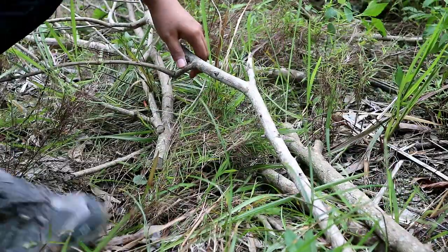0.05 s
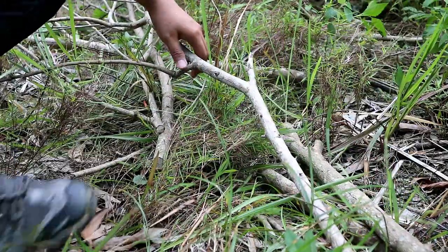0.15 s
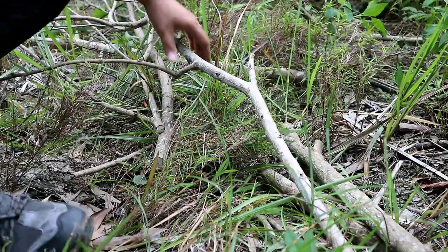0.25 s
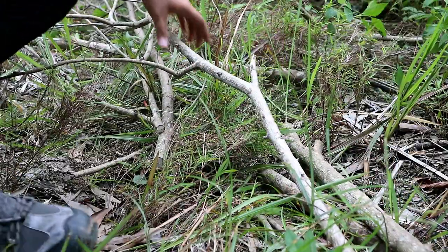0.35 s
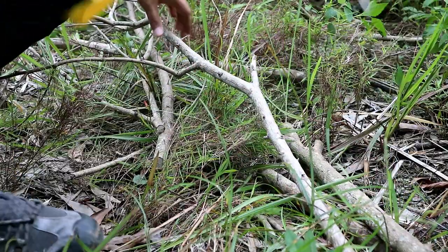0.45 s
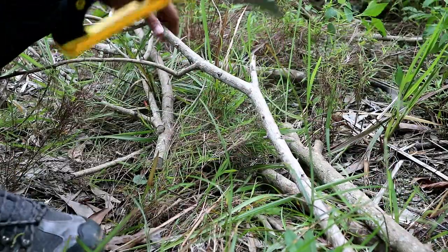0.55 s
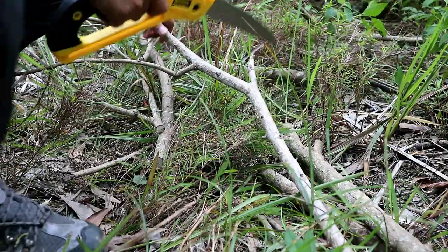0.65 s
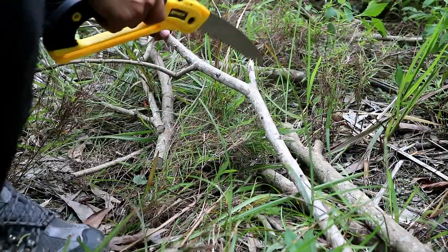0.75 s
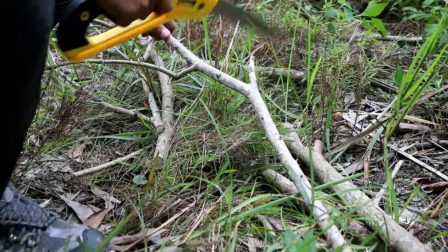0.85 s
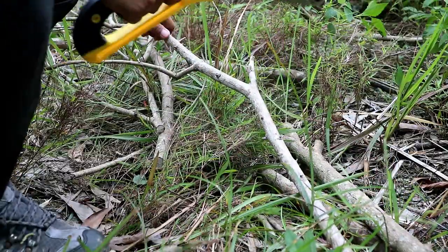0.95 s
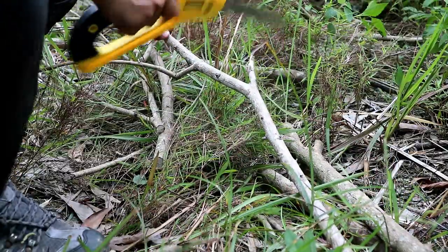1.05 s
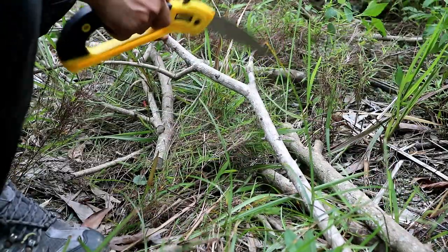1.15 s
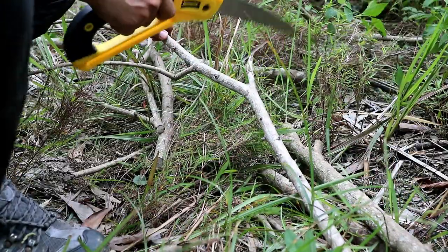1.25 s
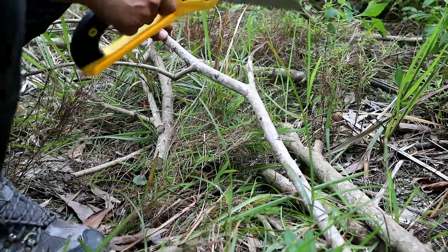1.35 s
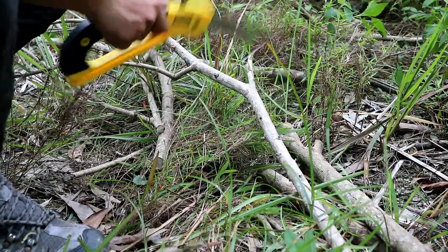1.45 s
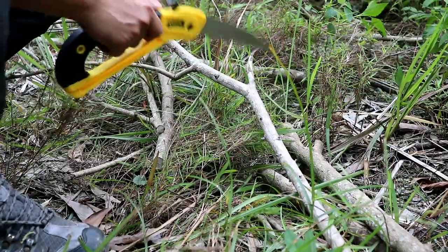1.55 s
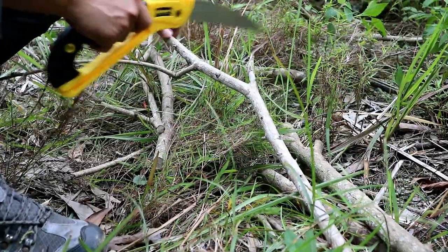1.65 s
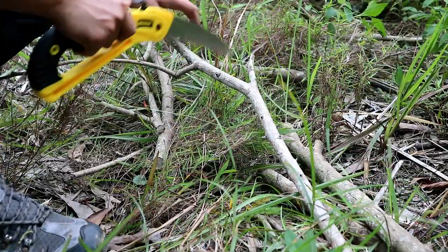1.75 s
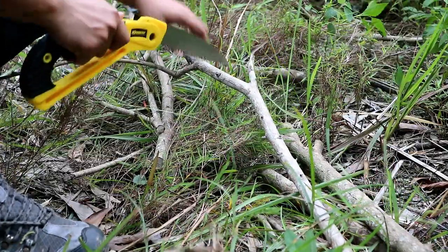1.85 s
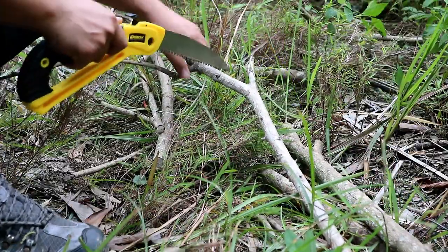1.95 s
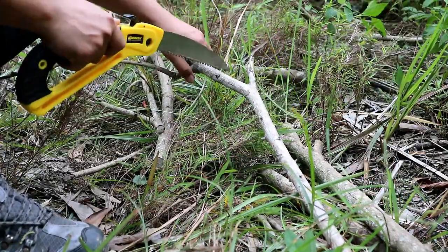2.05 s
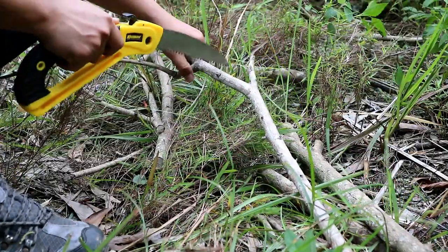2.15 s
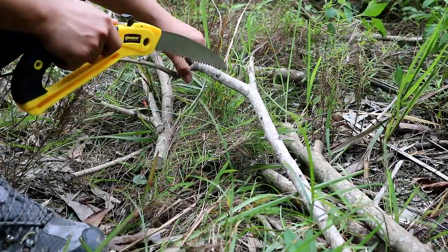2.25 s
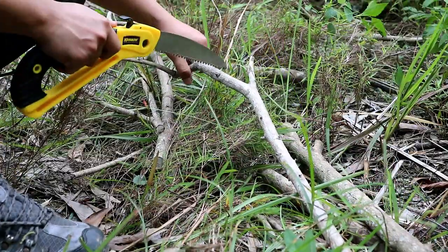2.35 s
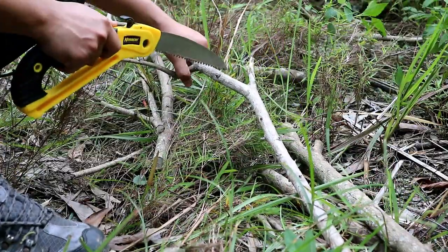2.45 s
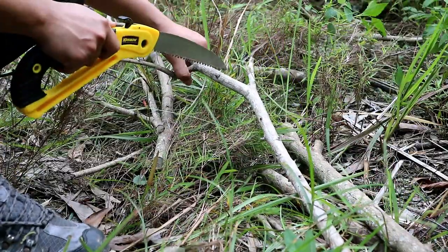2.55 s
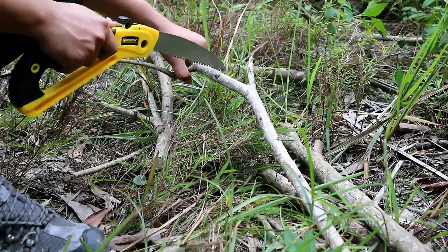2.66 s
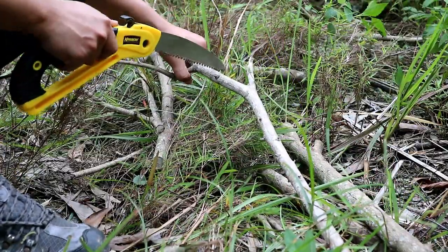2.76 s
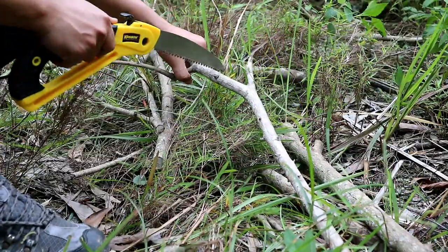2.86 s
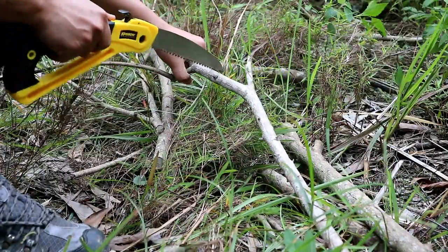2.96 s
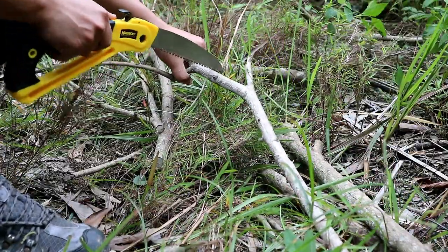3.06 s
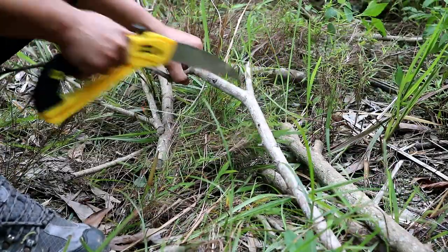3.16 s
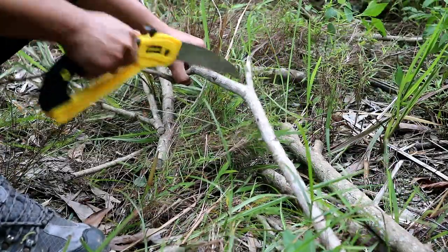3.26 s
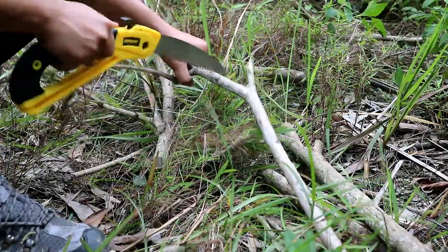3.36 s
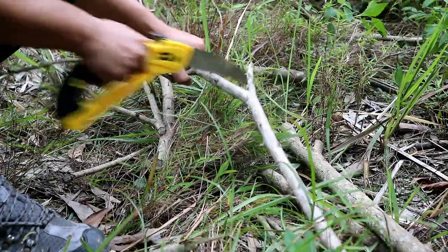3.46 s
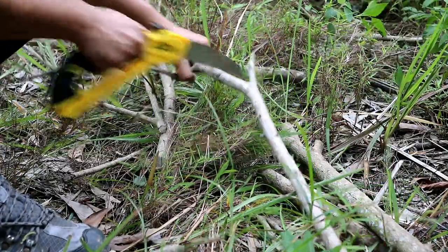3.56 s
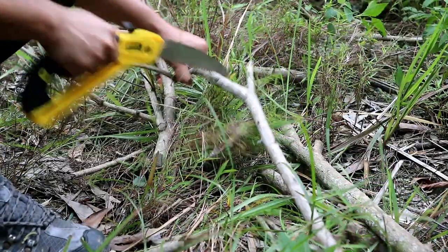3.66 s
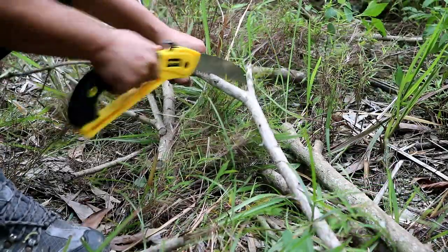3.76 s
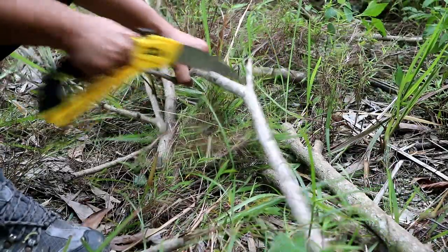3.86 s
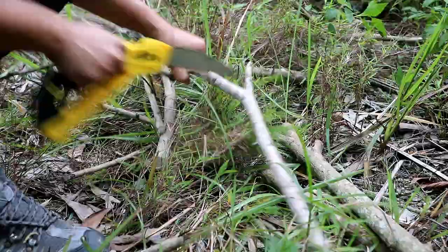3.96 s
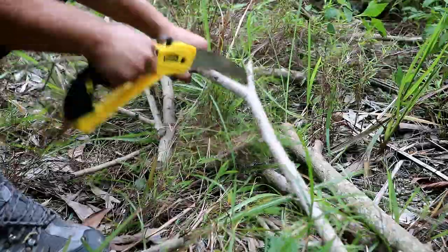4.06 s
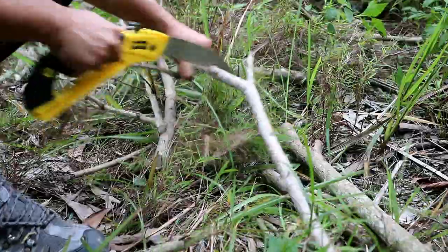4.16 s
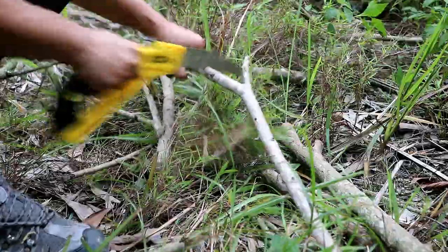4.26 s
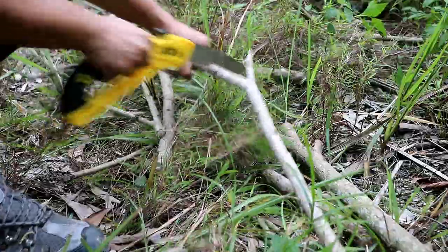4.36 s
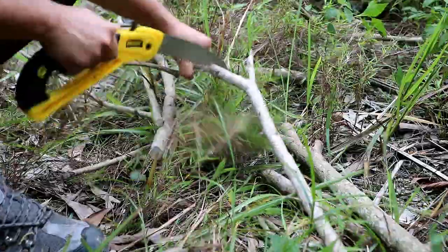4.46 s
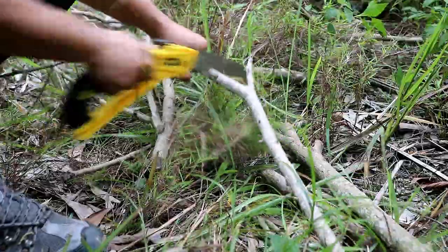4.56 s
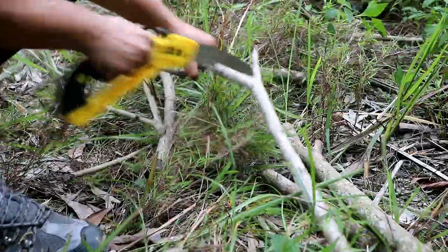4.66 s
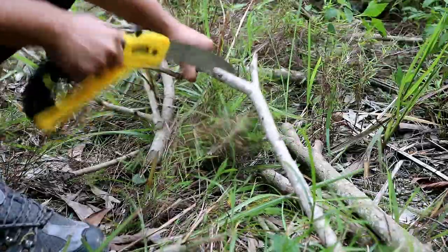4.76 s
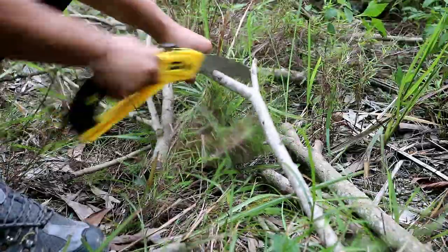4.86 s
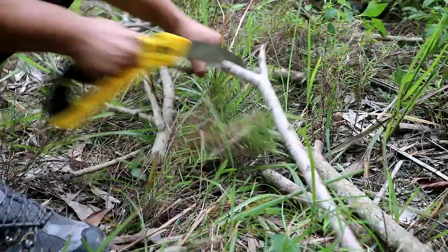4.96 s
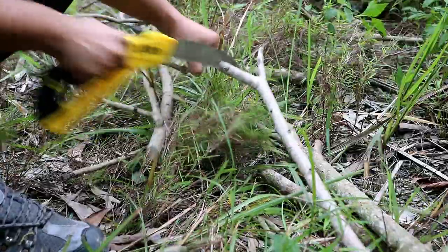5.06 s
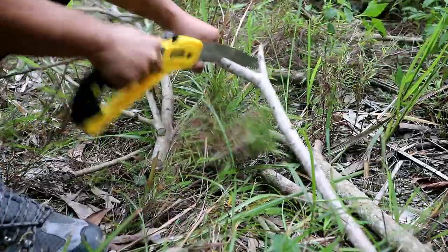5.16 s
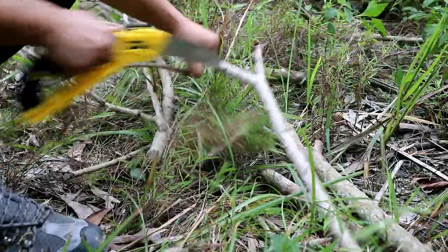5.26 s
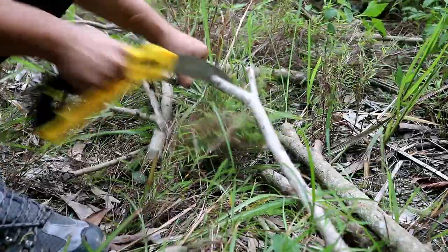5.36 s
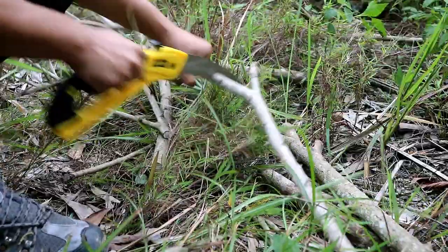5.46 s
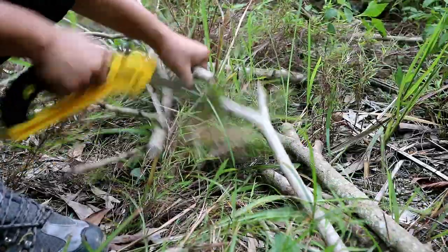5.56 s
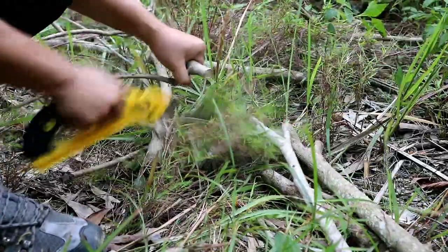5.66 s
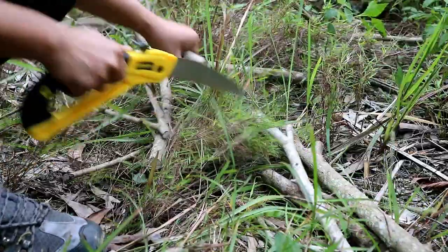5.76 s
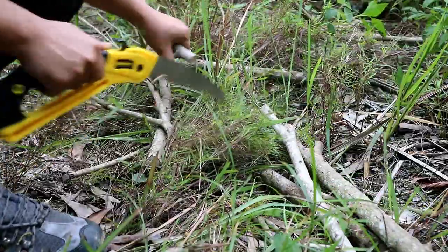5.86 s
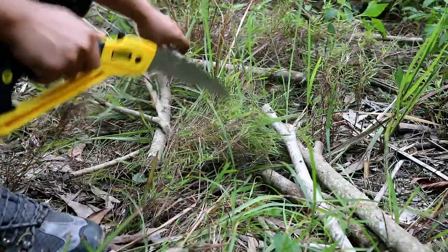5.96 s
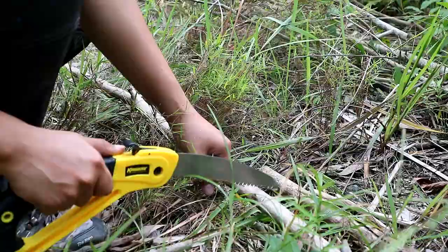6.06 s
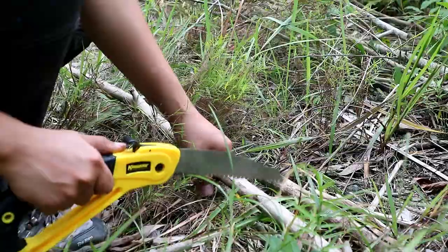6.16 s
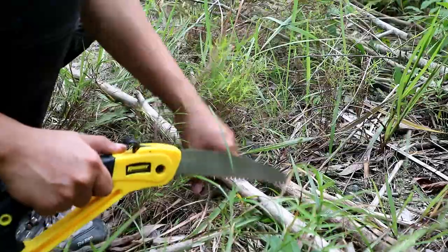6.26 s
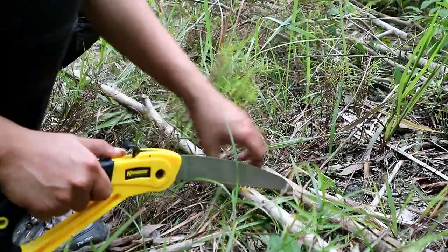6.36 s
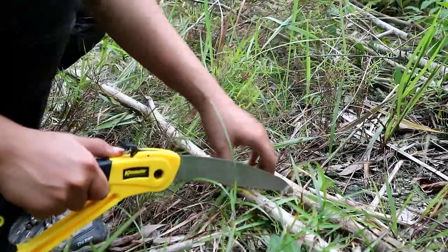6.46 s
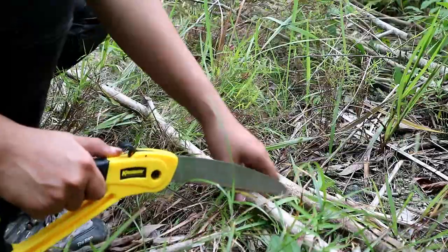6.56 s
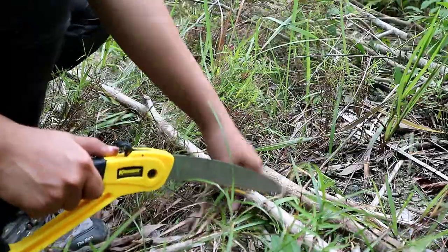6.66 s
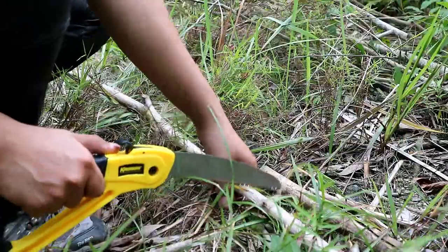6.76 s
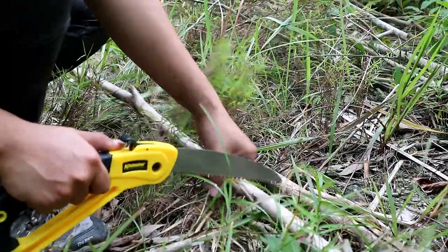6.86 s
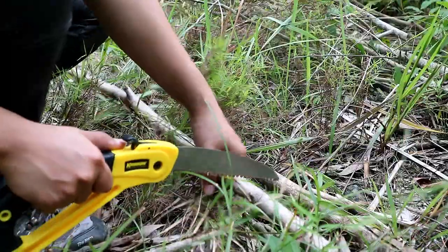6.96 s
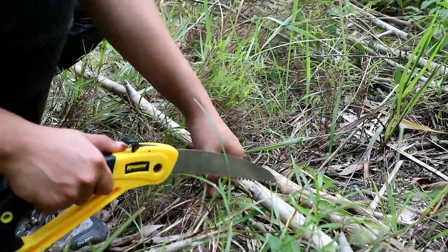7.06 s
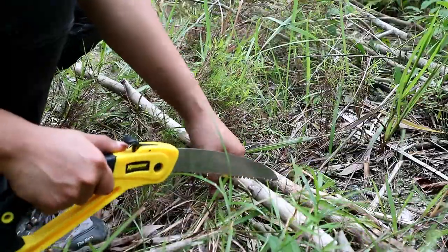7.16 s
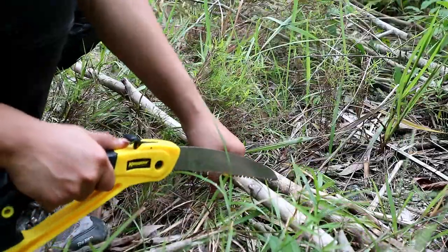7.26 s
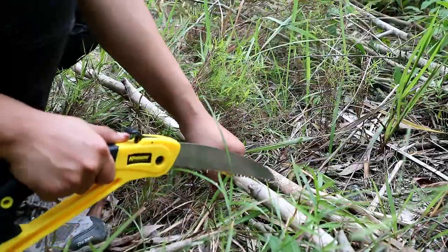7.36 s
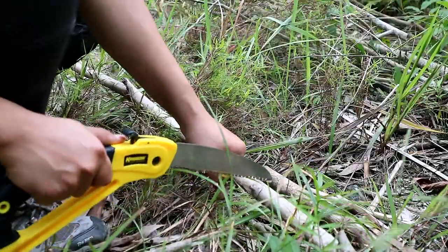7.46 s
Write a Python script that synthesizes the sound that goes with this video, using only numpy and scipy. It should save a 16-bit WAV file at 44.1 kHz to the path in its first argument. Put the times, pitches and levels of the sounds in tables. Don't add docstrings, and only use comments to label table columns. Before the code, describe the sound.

Outdoors, quick raspy back-and-forth saw strokes tear dry wood until it snaps loudly and falls, followed by soft rustling and small ticks in the grass.

```python
import sys
import numpy as np
from scipy import signal
from scipy.io import wavfile
from scipy.ndimage import uniform_filter1d

SR = 44100
rng = np.random.default_rng(int(sys.argv[2]) if len(sys.argv) > 2 else 0)


def amplitude_ratio(level_db):
    exponent = np.asarray(level_db, float) / 20
    return 10 ** exponent


def wav_out(sig):
    wavfile.write(sys.argv[1], SR, np.round(np.clip(np.atleast_2d(sig).T, -1, 1) * 32767).astype(np.int16))


N = 331191


def evened(x):
    return x / np.sqrt(np.mean(x ** 2) + 1e-20)


def read(points, hz):
    f, value = np.transpose(points)
    return np.interp(np.log(hz + 1), np.log(f + 1), value)


def add(mix, start_s, sound):
    part = mix[..., round(start_s * SR):][..., :sound.shape[-1]]
    part += sound[..., :part.shape[-1]]


def panned(left_right_db):
    return amplitude_ratio(np.array([[left_right_db / 2], [-left_right_db / 2]]))


def butter(x, order, hz, kind="low"):
    return signal.sosfilt(signal.butter(order, hz, kind, fs=SR, output="sos"), x)


def colour(x, points):
    half = np.log(amplitude_ratio(np.maximum(read(points, np.fft.rfftfreq(4096, 1 / SR)), -100)))
    log_gain = np.r_[half, half[-2:0:-1]]
    taps = np.fft.ifft(np.exp(np.conj(signal.hilbert(log_gain)))).real[:2048]
    return signal.oaconvolve(x, taps)[:len(x)]


def resonate(x, hz, width_hz):
    turn = np.exp(2j * np.pi * np.cumsum(hz * np.ones(len(x))) / SR)
    r = np.exp(-np.pi * width_hz / SR)
    return 2 * (turn * signal.lfilter([1 - r], [1, -r], x / turn + 1e-18)).real


def resonate_twice(x, hz, width_hz):
    return resonate(resonate(x, hz, width_hz), hz, width_hz)


def drift(samples):
    return evened(uniform_filter1d(rng.standard_normal(N), samples))


def clicks(per_s, spread_db):
    size = amplitude_ratio(spread_db * np.minimum(rng.exponential(1, N), 5)) * rng.choice([-1., 1.], N)
    return evened(size * (rng.random(N) < per_s / SR))


def curve(rows):
    s, db = np.transpose(rows)
    return uniform_filter1d(np.interp(np.arange(N) / SR, s, db, -200, -200), 100)


# freq_hz, left_right_db
SAW_BALANCE = [(60, 0), (180, 3), (550, 7), (1650, 0), (4970, 0.5), (15000, 0.5)]


def ports(x, scatter, patchy_db=2.2):
    lag_s, lag_limit_rad = 6.5e-5, .82
    hz, t, z = signal.stft(x, SR, nperseg=256, noverlap=192)
    field = rng.standard_normal((len(t), len(hz), 3)).T
    patches = evened(uniform_filter1d(uniform_filter1d(field[2], 3, 0), 45, 1))
    field = evened(uniform_filter1d(uniform_filter1d(field[:2], 3, 1), 8, 2))
    lag = np.exp(-1j * np.minimum(np.pi * hz * lag_s, lag_limit_rad))
    tilt = amplitude_ratio(read(SAW_BALANCE, hz) / 2) * lag
    stray = scatter * (1 + hz[:, None] / 8000) * np.exp(1j * np.pi * field)
    paths = (np.array([tilt, 1 / tilt])[..., None] + stray) / np.sqrt(1 + abs(stray) ** 2)
    return signal.istft(z * paths * amplitude_ratio(patchy_db * patches), SR, nperseg=256, noverlap=192)[1][:, :N]


# freq_hz, level_db_per_hz
AIR = [(12, -23), (20, -10), (133, 3), (378, 5), (501, 5), (2710, -11), (3320, -12), (4870, -11),
       (5830, -15), (6790, -10.5), (7530, -23), (8130, -30), (9000, -81), (11700, -95), (19800, -120)]
# freq_hz, likeness (1 same, -1 opposed)
SAME = [(30, .6), (65, -0.32), (180, -0.82), (550, -0.78), (1650, -0.34), (4970, -0.059), (15000, -1.6)]


def air():
    level_db = -57
    frames, hz = N // 256 + 5, np.fft.rfftfreq(1024, 1 / SR)
    a, b, c, d, patches = rng.standard_normal((frames, 513, 5)).T
    patches = evened(uniform_filter1d(uniform_filter1d(patches, 12, 0), 14, 1))
    same = np.clip(read(SAME, hz), -1, 1)[:, None]
    left = a + 1j * b
    right = same * left + np.sqrt(1 - same ** 2) * (c + 1j * d)
    z = np.array([left, right]) * amplitude_ratio(read(AIR, hz)[:, None] + 1.3 * patches)
    return amplitude_ratio(level_db) * evened(signal.istft(z, nperseg=1024, noverlap=768)[1][:, :N])


# pitch_hz, width_hz, level_db, throbs_per_s
INSECTS = [(7720, 220, -74.5, 22), (7730, 180, -65.5, 19), (7400, 130, -71, 82), (7235, 190, -72, 12),
           (11100, 4000, -90, 9.0)]


def insects():
    t, out = np.arange(N) / SR, np.zeros((2, N))
    for hz, width_hz, db, per_s in INSECTS:
        throb = amplitude_ratio(2.2 * np.sin(2 * np.pi * (per_s * t + rng.random())))
        for side in out:
            whistle = resonate(resonate_twice(rng.standard_normal(N), hz, width_hz), hz, 730)
            side += amplitude_ratio(db) * throb * evened(whistle)
    return out


def tone(rows, flutter, fading_db=5.0):
    s, hz, db = np.transpose(rows)
    t = np.arange(s[0], s[-1], 1 / SR)
    wobble, fading = evened(uniform_filter1d(rng.standard_normal((2, len(t))), 700))
    pitch_hz = np.interp(t, s, hz) * (1 + flutter * wobble)
    wave = np.sqrt(2) * np.sin(2 * np.pi * np.cumsum(pitch_hz) / SR)
    level = amplitude_ratio(np.interp(t, s, db) + fading_db * fading)
    return s[0], wave * level * signal.windows.tukey(len(t), .2)


# start_s, length_s, pitch_hz, level_db
COOS = [(1.89, 0.06, 557, -60), (2.086, 0.072, 571, -64), (2.118, 0.056, 660, -67), (2.143, 0.08, 724, -63),
        (2.2, 0.043, 666, -61.5), (2.225, 0.038, 730, -70), (2.278, 0.12, 715, -71),
        (2.442, 0.12, 724, -65), (2.538, 0.088, 737, -65), (2.632, 0.11, 706, -60),
        (2.716, 0.061, 658, -60), (2.793, .08, 648, -67), (2.456, 0.14, 571, -68.5), (2.59, 0.06, 550, -68),
        (2.65, 0.14, 560, -69), (2.833, 0.092, 565, -64.5), (2.94, 0.052, 526, -69)]


def doves():
    scoop_per_s, scoop_s, sag_per_s, swell_db = 0.27, 0.057, 0.32, -5
    out = np.zeros(N)
    for s, length, hz, db in COOS:
        rise = min(scoop_s, length / 2)
        note = np.array([(s, hz * (1 - scoop_per_s * length), db + swell_db),
                         (s + rise, hz, db),
                         (s + 0.58 * length, hz, db),
                         (s + length, hz * (1 - sag_per_s * length), db + swell_db)])
        add(out, *tone(note, 0.024, fading_db=3))
    return out * amplitude_ratio(np.array([[3.5], [-4.5]]))


# start_s, chirps, level_db, end_hz
TWITTERS = [(2.37, 2, -79, 4500), (2.69, 2, -72, 4400), (2.754, 3, -68, 4400), (2.85, 2, -76, 4500),
            (2.92, 3, -71, 4600), (6.2, 3, -70, 4700), (7.14, 2, -74, 4400), (7.204, 3, -65.5, 4680),
            (7.4, 3, -74, 4400)]


def twitter():
    gap_s, chirp_s, top_hz, fade_db = .0315, .015, 4930, -4
    echo_s, echo_db = .011, -8
    out = np.zeros(N)
    for s, chirps, db, end_hz in TWITTERS:
        for start in s + gap_s * np.arange(round(chirps)):
            chirp = [(start, top_hz, db), (start + chirp_s, end_hz, db + fade_db)]
            add(out, *tone(chirp, .007, fading_db=2))
    return out + amplitude_ratio(echo_db) * np.roll(out, round(echo_s * SR))


# time_s, pitch_hz, level_db
DRONE = [(3.9, 152, -52), (4.0, 135.3, -62.5), (4.15, 120.2, -72), (4.5, 120.4, -68), (4.7, 135.3, -75.5),
         (4.85, 169.6, -70.5), (5.05, 113, -70), (5.15, 115, -90)]


def fly():
    out = np.zeros(N)
    add(out, *tone(DRONE, 0.02))
    return out


# freq_hz, level_db_per_hz
LEAVES = [(530, -18.5), (900, -10), (1520, -5.5), (1780, -1.5), (1930, -3.5), (2530, -1.5), (5000, -7.5),
          (6500, -62.5), (11000, -120)]
GRASS = [(2350, -31), (4000, -6), (5700, -5), (7560, -9), (11200, -18), (12600, -27), (15000, -24)]
# time_s, effort_db
BOOTS = [(0.0, -63), (0.11, -58), (0.27, -57), (0.47, -61), (0.8, -63.5), (1.1, -75.5), (2.14, -68.5),
         (2.72, -72.5), (2.94, -71)]
# time_s, effort_db
FALL = [(5.44, -45), (5.52, -48), (5.545, -38.5), (5.568, -36.5), (5.6, -40.5), (5.63, -45), (5.692, -44),
        (5.896, -50.5), (6.022, -46), (6.06, -58), (6.072, -50.5)]
# time_s, effort_db
HAND = [(6.18, -66), (6.24, -61), (6.34, -59), (6.42, -58.5), (6.46, -68.5), (6.663, -60.5), (6.81, -60)]
# time_s, effort_db
SETTLE = [(6.81, -63), (6.835, -56), (6.91, -59.5), (7.01, -57.5), (7.1, -59), (7.125, -66), (7.3, -96),
          (7.42, -62), (7.51, -66)]


def rustle():
    # effort, scuff_db and grass_db at an effort of -60 dB
    moves = [(BOOTS, -64, -68), (FALL, -69, -73), (HAND, -77, -64), (SETTLE, -69.5, -64)]
    scuff_slope, grass_slope = 0.84, 1.54
    boots_left_db = 6
    clumps = amplitude_ratio(1.1 * drift(600))
    grains, blades = (evened(clicks(9000, 2.1) * clumps) for _ in range(2))
    scuff = evened(butter(grains, 2, [300, 1200], "band"))
    leaves = evened(colour(grains, LEAVES))
    grass = evened(colour(blades + .5 * grains, GRASS))
    out = np.zeros(N)
    for effort, scuff_db, grass_db in moves:
        db = curve(effort)
        out += amplitude_ratio(db - 1.5) * leaves
        out += amplitude_ratio(scuff_db + 1 + scuff_slope * (db + 60)) * scuff
        out += amplitude_ratio(grass_db + 3 + grass_slope * (db + 60)) * grass
    left_db = boots_left_db / 2 * (np.arange(N) / SR < BOOTS[-1][0])
    return ports(out, 0.9, patchy_db=1.4) * amplitude_ratio(np.array([left_db, -left_db]))


# start_s, level_db, pitch_hz, t60_s
RINGS = [(.226, -55, 2950, .3), (.905, -50, 277, 0.078), (1.152, -51, 1140, 0.18), (1.153, -40, 4760, .08),
         (1.155, -43.5, 2870, 0.16), (1.155, -48, 333, 0.068), (1.332, -40, 1110, 0.016),
         (1.527, -43, 3130, .05), (1.527, -48, 1400, .04), (1.534, -52, 2700, .12), (1.558, -50, 3100, .04),
         (1.601, -54, 4600, .05), (1.532, -42, 247, 0.043), (1.953, -54.5, 2980, 0.15),
         (2.134, -39, 3100, 0.054), (2.136, -43, 1800, 0.046), (5.412, -30, 2300, 0.04),
         (5.529, -20, 5440, .025), (5.54, -48, 230, .15), (5.712, -50, 240, .1), (5.724, -37, 2650, .04),
         (1.619, -58, 3850, .04), (5.712, -35, 1380, 0.075)]


def rings():
    out, t = np.zeros(N), np.arange(9000) / SR
    for (s, db, hz, t60), draw in zip(RINGS, rng.standard_normal((len(RINGS), len(t)))):
        rattle = evened(resonate_twice(draw, hz, .1 * hz + 60))
        sound = 0.65 * rattle + np.sin(2 * np.pi * hz * t)
        add(out, s, amplitude_ratio(db - 60 * t / t60) * sound * (1 - np.exp(-t / 0.00017)))
    return out


# start_s, peak_db, pitch_hz, t60_s
TWIGS = [(0.266, -43.5, 800, 0.031), (0.389, -48, 649, .03), (0.704, -42, 720, 0.031),
         (0.775, -40, 660, 0.0058), (0.802, -43.5, 610, 0.0084), (0.883, -51, 1190, .02),
         (0.905, -44, 1270, 0.011), (0.915, -39.5, 834, 0.011), (0.93, -36, 875, 0.0089),
         (0.937, -33, 1500, 0.003), (0.955, -45, 711, .011), (0.965, -38, 800, 0.013),
         (1.332, -36, 1040, 0.011), (1.969, -51, 1070, 0.022), (2.271, -38, 800, 0.019),
         (1.152, -30, 1260, 0.039), (5.54, -17.5, 1300, 0.032), (5.549, -27, 1150, 0.059),
         (5.605, -32.5, 870, 0.053), (5.711, -23, 1270, 0.081), (5.819, -55, 896, .02),
         (5.907, -44, 2150, .032), (6.056, -45.5, 625, .02), (6.422, -46, 1770, 0.015),
         (7.002, -50, 1110, 0.056), (7.474, -55, 640, 0.017)]
# start_s, peak_db, pitch_hz, t60_s
TAPS = [(.07, -35.5, 4400, 0.0092), (.079, -37.5, 4585, 0.018), (.139, -46, 2660, .02),
        (.235, -32, 2930, 0.28), (.267, -33.5, 2920, 0.099), (1.152, -19.5, 3100, 0.042),
        (1.177, -32, 2800, 0.19), (1.476, -41.5, 3020, 0.02), (1.528, -28, 3100, 0.051),
        (1.554, -33.5, 2980, 0.14), (1.602, -46, 4550, 0.02), (1.951, -38, 3200, 0.058),
        (2.135, -34.5, 3460, 0.037), (2.254, -37.5, 2800, 0.076), (2.939, -41.5, 3800, 0.025),
        (2.969, -39.5, 4100, .018), (5.566, -17, 3200, 0.06), (5.578, -20.5, 3100, 0.055),
        (5.727, -22, 3000, 0.047), (5.756, -25.5, 4100, 0.018), (5.797, -26, 4130, 0.044),
        (6.237, -35, 4700, 0.0096), (6.286, -38, 5600, .015), (6.329, -38.5, 3790, 0.032),
        (6.581, -55, 3110, .02), (6.616, -43, 3270, 0.017), (6.687, -37, 5500, .02),
        (6.826, -48, 2890, .02), (6.852, -42, 4100, .03), (6.868, -36, 4000, .02),
        (6.883, -36.5, 4200, 0.027), (6.968, -54, 4820, 0.015), (7.003, -35, 3580, .025),
        (7.024, -35, 4700, .03), (7.038, -35, 4000, 0.022), (7.099, -49, 3300, .02),
        (7.194, -44, 3270, .02), (7.304, -45, 2900, 0.02), (7.388, -43, 4500, 0.023),
        (7.452, -42, 3180, 0.022), (7.474, -40, 4420, 0.022)]
# start_s, peak_db, pitch_hz, t60_s
SNAPS = [(3.6664, -11, 2330, 0.0063), (4.299, -29, 2510, 0.022), (4.736, -13, 2388, 0.064),
         (5.078, -13.5, 3520, 0.029), (5.361, -12.5, 2730, 0.0088), (5.366, -14, 3200, 0.0079),
         (5.398, -10, 3440, 0.012), (5.405, -13, 2900, .012), (5.41, -3, 2840, 0.019),
         (5.432, -13, 3370, 0.025), (5.4415, -16.5, 3100, 0.03), (5.461, -21, 3880, 0.054),
         (5.526, -19, 3400, 0.025), (5.5295, -8.5, 2820, 0.026), (5.533, -16, 2600, 0.024)]


def knocks():
    # events, body_db, crack_db, left_right_db, pulse_db, pulse_cycles
    kinds = [(TWIGS, -8.5, -15, 4.2, -3.5, 1.04), (TAPS, -18, -19, 2.5, -7, 1.63),
             (SNAPS, -90, -14, 0.33, -3.5, 0.9)]
    out, t = np.zeros((2, N)), np.arange(3000) / SR
    events = [tuple(row) + tuple(shared) for rows, *shared in kinds for row in rows]
    chance = rng.standard_normal((len(events), 2, len(t)))
    for (s, db, hz, t60, body_db, crack_db, pan_db, pulse_db, cycles), draw in zip(events, chance):
        fade = (1 - np.exp(-t / 0.0017)) * amplitude_ratio(-60 * t / np.clip(t60, .004, .2))
        late = t - .0012
        pulse = np.exp(-(late * hz / cycles) ** 2) * np.sin(2 * np.pi * hz * late)
        upper = resonate_twice(draw[0], 1.5 * hz, 2.0 * hz)
        splinters = (resonate_twice(draw[0], hz, .5 * hz) + .5 * upper) * fade
        body = resonate(resonate(draw[1], 1398, 760), 760, 570) * fade
        tick_fade = amplitude_ratio(-60 * t / np.minimum(t60, 0.02)) * np.minimum(t / 0.0015, 1)
        tick = resonate_twice(draw[1], 5600, 4000) * tick_fade
        sound = amplitude_ratio(pulse_db) * pulse + amplitude_ratio(crack_db) * tick / abs(tick).max()
        sound += 0.29 * splinters / abs(splinters).max()
        sound += amplitude_ratio(body_db - 1.0) * body / abs(body).max()
        add(out, s, amplitude_ratio(db) * sound * panned(pan_db))
    out = butter(out, 2, [450, 9500], "band")
    return np.array([ports(side, .15, patchy_db=0)[k] for k, side in enumerate(out)])


# start_s, peak_db, above_7khz_db, left_right_db
CRACKS = [(3.6677, -21, -5, 13), (4.6915, -36, -6, 0), (4.727, -28, -6, 0), (5.08, -29, -13, 3),
          (5.099, -32, -6, 0), (5.362, -25.5, -15, 0), (5.4, -30, -17, 0), (5.4109, -14.5, -36, -3),
          (5.432, -39, -18, 8), (5.5303, -15.5, -16, -.6)]


def cracks():
    t60_s, core_hz, width_hz = 0.0079, 4600, 3700
    out, t = np.zeros((2, N)), np.arange(600) / SR
    fade = (1 - np.exp(-t / 0.000067)) * amplitude_ratio(-60 * t / t60_s)
    for (s, db, top_db, pan_db), draw in zip(CRACKS, rng.standard_normal((len(CRACKS), 2, len(t)))):
        core = resonate_twice(draw[0], core_hz, width_hz) * fade
        edge = butter(draw[1], 1, [7000, 10500], "band") * fade
        sound = core / abs(core).max() + amplitude_ratio(top_db) * edge / abs(edge).max()
        add(out, s - .0004, amplitude_ratio(db) * sound * panned(pan_db))
    return out


# start_s, peak_db, pitch_hz
CATCHES = [(3.15, -38, 3120), (3.157, -26, 2570), (3.1646, -18.5, 3020), (3.173, -18, 2490),
           (3.1815, -20.5, 3080), (3.307, -28, 2550), (3.3516, -20.5, 2890), (3.3702, -25, 3020),
           (3.378, -35, 2960), (3.434, -43, 2410), (3.4848, -17.5, 3040), (3.494, -24, 3400),
           (3.5821, -21, 2870), (3.606, -17.5, 2760), (3.6225, -24, 2590), (3.6415, -21, 3000),
           (3.6497, -24, 2800), (3.658, -29, 2560), (3.6907, -28.5, 3930), (3.708, -42, 2590),
           (3.736, -24, 2680), (3.745, -27, 2400), (3.752, -34, 2700), (3.784, -31, 2800),
           (3.8563, -42, 3060), (3.863, -26, 3420), (3.906, -27, 2600), (3.915, -27, 2740),
           (3.922, -27, 2610), (3.9373, -38, 2530), (3.9417, -39, 3030), (3.976, -25.5, 3000),
           (4.0466, -30, 2880), (4.075, -25, 2620), (4.155, -31, 2590), (4.179, -27, 2670),
           (4.1954, -32, 2460), (4.199, -25, 2530), (4.2199, -42, 4000), (4.254, -29, 2900),
           (4.4406, -29, 3000), (4.45, -31, 2980), (4.4803, -24, 3010), (4.4913, -29.5, 2360),
           (4.524, -39, 3000), (4.5707, -19, 2897), (4.623, -31, 2220), (4.772, -31, 3100),
           (4.8224, -33.5, 2900), (4.847, -26.5, 3030), (4.9035, -39, 2710), (4.962, -23.5, 2550),
           (5.0346, -22, 3280), (5.0908, -26, 3100), (5.146, -21, 3040), (5.16, -32, 3420),
           (5.2363, -42, 3810), (5.2446, -25, 3550), (5.2837, -27, 3480), (5.3235, -24, 3050)]


def catches():
    rise_s, t60_s, grit_db = 0.0014, 0.018, -8
    out, t = np.zeros(N), np.arange(1500) / SR
    decay = amplitude_ratio(-60 * t / t60_s)
    fade = (1 - np.exp(-(t / rise_s) ** 2)) * decay
    for (s, db, hz), draw in zip(CATCHES, rng.standard_normal((len(CATCHES), 2, len(t)))):
        ring = np.sin(2 * np.pi * hz * t) + .35 * evened(resonate_twice(draw[0], hz, 900))
        grit = evened(resonate(resonate(draw[1], 6100, 5000), 7500, 5000))
        sound = (ring + amplitude_ratio(grit_db) * grit * decay) * fade
        add(out, s, amplitude_ratio(db) * sound / abs(sound).max())
    return butter(out, 2, 8000)


# start_s, end_s, peak_db, lean_to_end_db, blade_ring_hz
STROKES = [(3.141, 3.238, -32, 0.5, 2840), (3.299, 3.393, -30.5, 4, 2760), (3.436, 3.523, -27.5, 2, 2760),
           (3.577, 3.686, -27, 0.5, 2560), (3.704, 3.812, -28, -0.5, 2820), (3.853, 3.955, -26, 0, 2650),
           (3.976, 4.09, -30.5, 0, 2480), (4.12, 4.236, -29.5, -2.5, 2590), (4.249, 4.349, -29, 2, 2650),
           (4.389, 4.504, -28, 1.5, 2800), (4.53, 4.63, -29, 1.1, 3000), (4.675, 4.785, -27.5, 1, 2590),
           (4.807, 4.916, -30, 3.5, 3740), (4.957, 5.047, -25, 2.8, 2820), (5.081, 5.184, -32, 2, 3100),
           (5.235, 5.33, -28, 2, 3300), (5.362, 5.445, -32.5, -0.5, 3500)]


def bite():
    ends_db, rest_db = -3.5, -46.5
    lead_s, engage_s, engage_db = .03, .004, -10
    slow_s, stop_db, settle_s = 0.023, -8.5, 0.018
    level_db = curve([(STROKES[0][0], rest_db), (STROKES[-1][1] + settle_s, rest_db)])
    for start, end, db, lean_db, _ in STROKES:
        opening_db, closing_db = db + ends_db - lean_db, db + ends_db + lean_db
        stroke = [(start - lead_s, rest_db - 22),
                  (start - engage_s, opening_db + engage_db),
                  (start + engage_s, opening_db),
                  ((start + end) / 2, db),
                  (end - slow_s, closing_db),
                  (end, closing_db + stop_db),
                  (end + settle_s, rest_db)]
        level_db = np.maximum(level_db, curve(stroke))
    return level_db


# ring_share_db, second_ring_hz, second_share_db
SINGING = [(-3.5, 4900, -35), (-4, 4900, -39), (-4, 5300, -33), (-8, 4900, -26), (-0.5, 4700, -40),
           (-15, 4800, -39), (-2.5, 1600, -11), (-15, 3800, -18), (-0.5, 3630, -22), (-31, 2300, -19),
           (-8, 3400, -8), (-18, 2400, -33), (-2, 2900, -12), (-21, 3700, -18), (0, 3560, -3),
           (-15, 3460, -5.5), (3.5, 2730, -10.5)]
# pitch_hz, width_hz, level_db
BLADE_MODES = [(1990, 97, 14), (2590, 47, -21), (3100, 390, 16), (3750, 90, 14), (4950, 200, -53.5),
               (7360, 180, 3)]
# freq_hz, level_db_per_hz
BLADE = [(940, -62.5), (1600, -23.5), (1930, -11), (2830, -10.5), (3950, -13.5), (4290, -15), (4910, -11),
         (6500, -24.5), (8450, -32), (14300, -120)]
DUST = [(3240, -78.5), (5500, -11.5), (7350, -14.5), (10200, -22), (12000, -31.5), (14500, -41),
        (16000, -40)]
WOOD = [(40, -43.5), (118, -15), (225, -9), (744, -5), (840, -0.5), (1600, -0.5), (1900, -2.5),
        (2470, -32.5), (4180, -120)]


def saw():
    teeth_per_s, fibres_per_s = 260, 12000
    ring_width_hz, second_width_hz = 860, 920
    ring_fades, firm_db = .5, -35
    dust_lingers = 0.084
    branch_lag_s = 0.011
    bite_db = bite()
    start, end, _, _, hz = np.transpose(STROKES)
    pull = np.arange(len(hz)) % 2 == 1

    def by_stroke(values):
        return np.interp(np.arange(N) / SR, (start + end) / 2, values)

    wood_db = by_stroke(np.where(pull, -13.5, -9))
    dust_db = by_stroke(np.where(pull, -10, -12.5))
    shake_db = by_stroke(np.where(pull, -42, -36))
    ring_hz = by_stroke(hz)
    ring_db, second_hz, second_db = (by_stroke(v) for v in np.transpose(SINGING))

    teeth = np.cumsum(teeth_per_s * np.exp(0.52 * drift(90))) / SR
    catch = .9 + np.exp(-(teeth % 1) / 0.28)
    chatter = amplitude_ratio(1.1 * drift(150))
    tear, grit, thump = (evened(clicks(fibres_per_s, db) * catch * chatter) for db in (1.7, 2.7, 2.0))

    modes = sum(amplitude_ratio(db) * evened(resonate(tear, hz, width_hz)) for hz, width_hz, db in BLADE_MODES)
    flex = evened(resonate_twice(tear, ring_hz, ring_width_hz))
    second = evened(resonate_twice(tear, second_hz, second_width_hz))
    sung = amplitude_ratio(ring_db) * flex + amplitude_ratio(second_db) * second + 0.22 * evened(modes)
    sung = sung * amplitude_ratio(ring_fades * np.minimum(bite_db - firm_db, 0))
    blade = amplitude_ratio(-3.2) * (evened(colour(tear, BLADE)) + sung)

    dust = evened(colour(grit + 0.61 * tear, DUST))
    dust_db = dust_db - dust_lingers * (bite_db + 29)
    knock = evened(resonate(thump, 0.519 * ring_hz, 85))
    wood = evened(evened(colour(thump + 0.17 * tear, WOOD)) + 0.25 * knock)
    shake = evened(butter(thump, 2, 126))
    keep = np.exp(-1 / (branch_lag_s * SR))
    sway = signal.lfilter([1 - keep], [1, -keep], amplitude_ratio(bite_db))
    return amplitude_ratio(bite_db) * (blade + amplitude_ratio(dust_db) * dust) + sway * (amplitude_ratio(shake_db) * shake + amplitude_ratio(wood_db) * wood)


def scene():
    background = air() + insects() + doves() + twitter() + fly()
    handling = rustle() + knocks() + cracks()
    cut = ports(saw() + rings(), 0.62) + ports(catches(), 0.27, patchy_db=-5.5)
    return background + handling + cut


def top_cut(x):
    return signal.sosfilt(signal.butter(12, 16450, fs=SR, output="sos"), x)


def record(dry):
    clear = butter(dry, 2, 55, "high")
    clear = signal.oaconvolve(clear, signal.firwin(255, 15700, fs=SR)[None], "same")
    return top_cut(clear)


dry = scene()
out = record(dry)
wav_out(out)
```